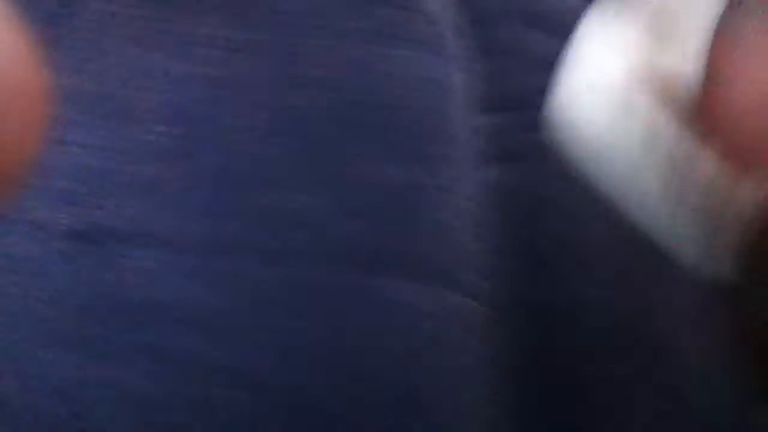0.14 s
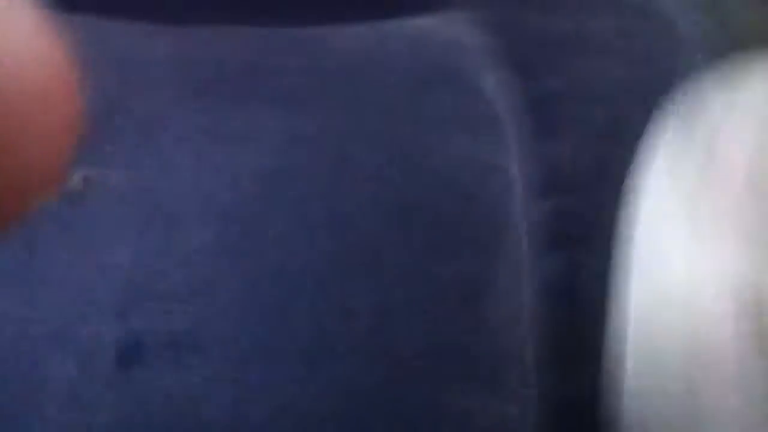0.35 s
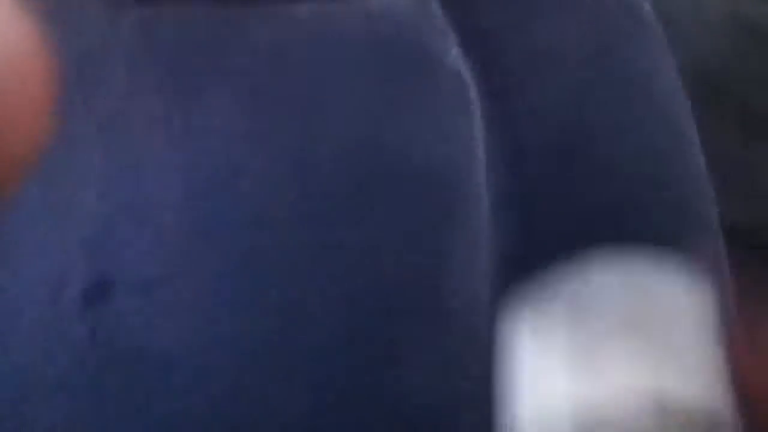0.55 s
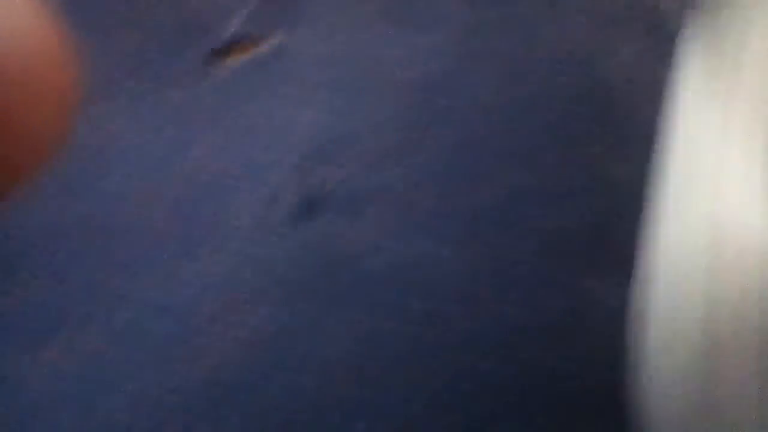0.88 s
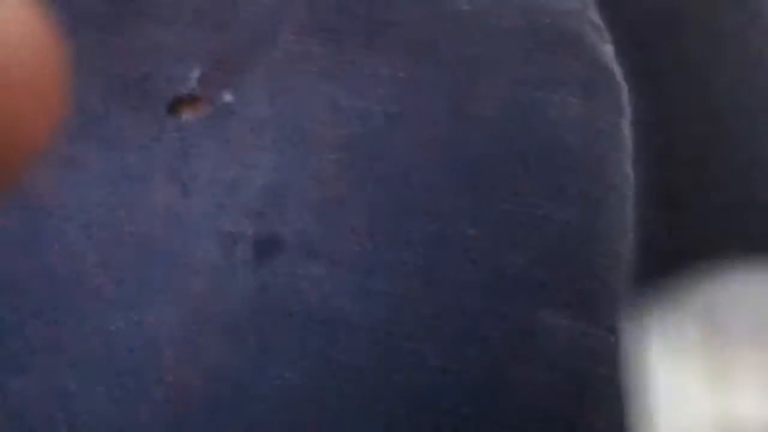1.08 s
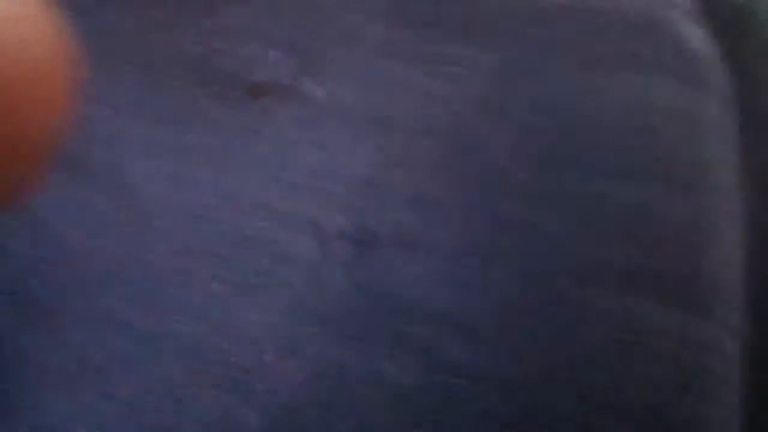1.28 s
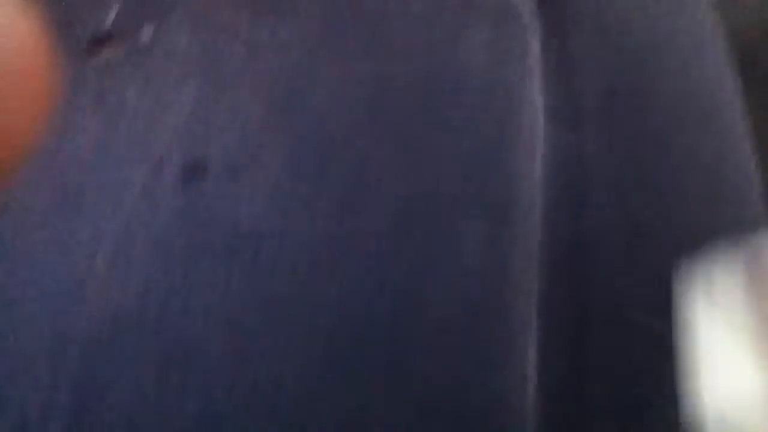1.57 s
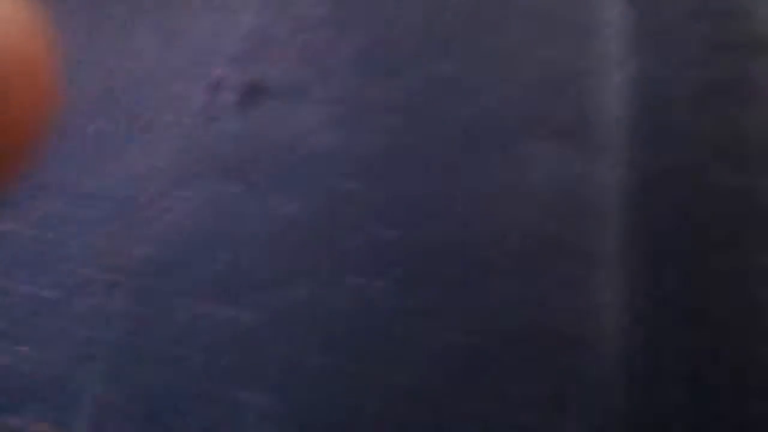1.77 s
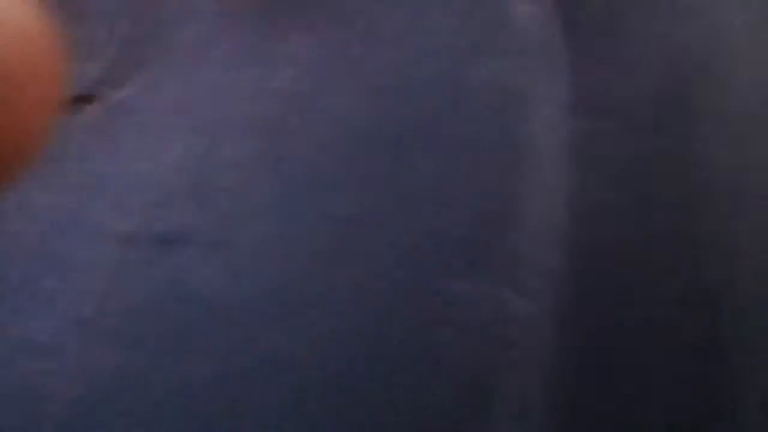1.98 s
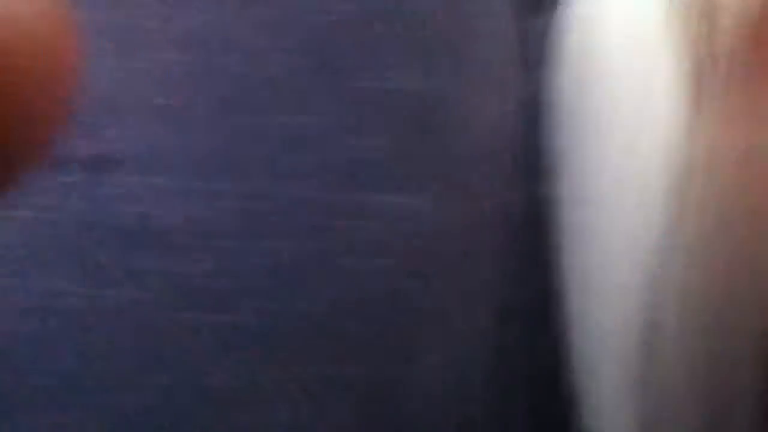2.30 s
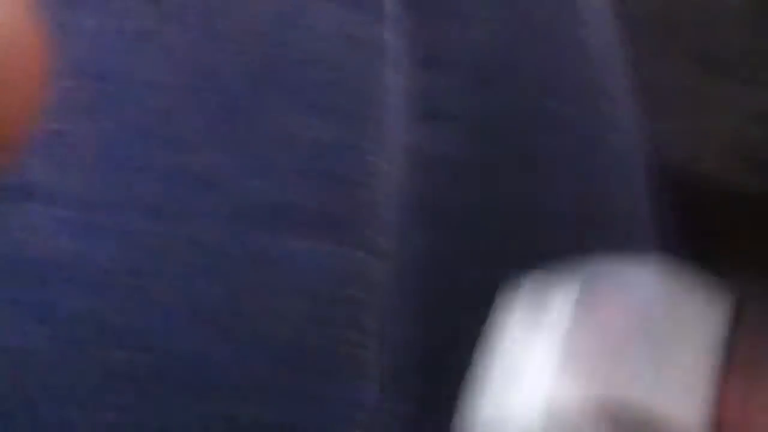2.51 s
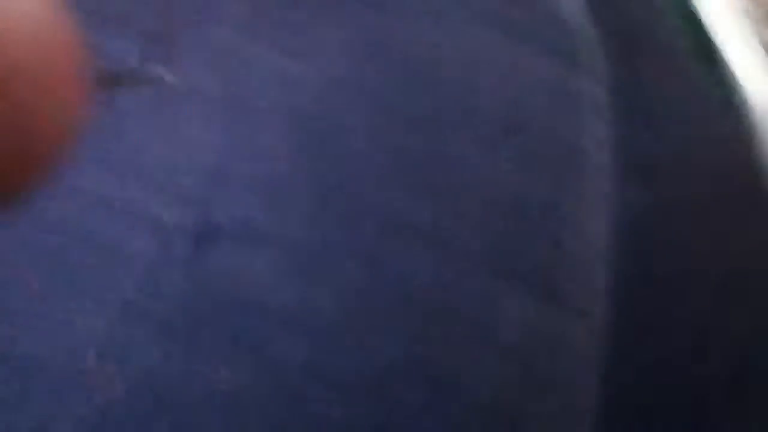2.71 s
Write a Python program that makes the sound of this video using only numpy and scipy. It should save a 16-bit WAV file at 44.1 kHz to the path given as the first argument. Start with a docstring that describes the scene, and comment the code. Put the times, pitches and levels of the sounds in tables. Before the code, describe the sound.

A hand scrubber rubs rapidly back and forth on cloth upholstery, with two sharp clicks

```python
"""A close, dry rub comes first: a hand scrubber goes back and forth on a cloth seat, about four strokes a second.
Catching fibres ring through its body, the cushion rumbles, the nap hisses, and the ribs of the weave sing
a rough note that follows the hand's speed. Random grains make the textures; fuzzy sine lines make the note.
Two sharp clicks, each a filtered impulse, chatter and thud, cut in over snags, bumps, squeaks and rustle."""
import sys
import numpy as np
from scipy import signal
from scipy.fft import rfft, irfft, next_fast_len
from scipy.io import wavfile
from scipy.ndimage import uniform_filter1d, map_coordinates

SR = 44100
rng = np.random.default_rng(int(sys.argv[2]) if len(sys.argv) > 2 else 0)


def to_wav(s):
    """Save 16-bit WAV."""
    ch = np.atleast_2d(s).T  # columns
    pcm = np.round(np.clip(ch, -1, 1) * 32767)  # PCM
    wavfile.write(sys.argv[1], SR, pcm.astype(np.int16))


N = 125685

# Strokes of the hand; levels are before speed, grip and pressure shape them:
# (start [s], end [s], rub level [dB], bright edge level [dB], hiss level [dB], cushion level [dB],
#  rib rate at top speed [Hz], weave level [dB], pressure growth over the stroke [dB])
STROKES = [(-.2, 0.062, -40, -34.5, -49, -41, 1700, -48, -13.5),
           (0.06, 0.347, -36.5, -36, -50.5, -45.5, 2128, -45, -4),
           (0.337, 0.6, -40.5, -40.5, -56, -47.5, 1727, -42, 9.5),
           (0.608, 0.877, -37.5, -36, -50, -46.5, 2046, -39.5, -4),
           (0.881, 1.142, -39.5, -38, -54, -44.5, 2099, -43.5, 7),
           (1.14, 1.37, -36, -36.5, -50.5, -45, 2076, -41, 1.5),
           (1.39, 1.623, -52, -47, -65, -60, 1660, -57, 13.5),
           (1.623, 1.871, -44, -42.5, -57.5, -51, 2100, -50.5, 7),
           (1.872, 2.113, -48, -46.5, -64, -57, 1907, -47.5, 4),
           (2.105, 2.339, -42.5, -44, -56, -55, 2015, -47, 3.5),
           (2.355, 2.559, -41.5, -40, -55, -53, 2246, -45.5, 4),
           (2.558, 2.809, -40.5, -40, -53.5, -51, 2234, -43, 2.5),
           (2.811, 3.052, -38, -46, -56, -45, 1895, -44, -1.5)]
# Colours, relative within each table: (frequency [Hz], level [dB])
RUB_COLOUR = [(150, -37.5), (300, -7.5), (540, -8.5), (720, 0.5), (860, 2.5), (1060, 1), (1200, -6.5),
              (1420, -0.5), (1800, -7), (2200, -6), (2870, -19.5), (4200, -29.5), (5200, -27),
              (8000, -62.5)]  # fibres ringing through the scrubber's body
RASP_COLOUR = [(1700, -34.5), (2700, -1), (3500, -1.5), (6500, -26.5)]  # stiff fibres scratching
HISS_COLOUR = [(1880, -38), (3400, -3), (4560, -14.5), (5350, -11), (6160, -15), (7830, -10.5), (9400, -3),
               (11200, -6), (14700, -7.5)]  # nap of the cloth
CUSHION_COLOUR = [(40, -22), (140, -7.5), (185, 2.5), (212, -7.5), (245, 2.5), (295, -11), (360, -7),
                  (480, -16), (1000, -54.5)]  # rumble of the padding
RUSTLE_COLOUR = [(40, 6), (260, 0), (450, -2), (1300, -8), (3000, -21.5), (6500, -31.5), (10000, -25),
                 (15800, -34.5)]  # restless cloth
DULL_CLICK_COLOUR = [(50, -37), (130, -3.5), (546, -6), (1130, 4), (1560, -10.5), (1950, -3.5), (2390, -11),
                     (3100, -7.5), (3870, -14), (4460, -26), (5300, -16), (7400, -17.5), (9430, -31),
                     (11700, -29), (15000, -45)]  # first click
BRIGHT_CLICK_COLOUR = [(50, -21), (130, -1), (869, 4), (1500, -10), (2300, 6), (3650, -1), (4650, -10),
                       (5500, -8.5), (6700, -32.5), (8000, -17.5), (11100, -20), (15000, -41)]  # second click
THUD_COLOUR = [(110, -14.5), (300, 14.5), (850, 10.5), (2200, -24), (7000, -80)]  # the scrubber's shell settling after each click
# Gain of the scrubber's body on the weave note: (frequency [Hz], gain [dB])
WEAVE_BODY = [(400, -4.5), (1030, -0.5), (1220, -2), (1450, 0.5), (2000, -1), (2700, -3)]
# Fuzzy lines of the weave note: (multiple of the rib rate, level [dB], line width [Hz])
WEAVE_LINES = [(.5, -1, 45), (1, 2.5, 58)]
# The two clicks: (time [s], snap peak [dB], thud peak [dB], thud delay [s])
CLICKS = [(1.4291, -1.5, -25, 0.00608), (1.934, -2, -34, 0.00476)]
# Fibres snag and let go; starting level before the low-pass: (time [s], level [dB])
SNAGS = [(0.365, -45), (.912, -37.5), (1.177, -33.5), (1.531, -37), (2.4, -36.5)]
# The scrubber bumps over the padding: (time [s], level [dB])
BUMPS = [(0.199, -43), (.763, -46), (1.016, -39), (1.061, -41), (1.28, -38), (1.74, -42.5), (2.675, -45)]
# Thin, hissy squeaks as the pad turns, level at the top of the swell: (time [s], level [dB])
SQUEAKS = [(2.12, -71.5), (2.55, -71)]
# Level curve of the rustling cloth: (time [s], level [dB])
RUSTLE_LEVEL = [(0, -54.5), (.35, -51.5), (0.601, -53.5), (.88, -53), (1.14, -52), (1.381, -53),
                (1.62, -55.5), (1.869, -59), (2.101, -57.5), (2.34, -59), (2.549, -50), (2.799, -57.5)]

GRIP_SPEED = 0.33  # share of top speed around which the fibres take hold
CUSHION_GROWS = 0.36  # cushion loudness as a power of speed; the other layers are proportional to it
EDGE_HZ = 1360  # above this lies the bright edge of the rub
CATCHES_PER_S, CATCH_SPREAD_DB = 5000, 2
RASP_DB = -23  # against the bright edge
WEAVE_FADE_DB = 6.5  # fall of the note over a stroke, before pressure
WEAVE_LAG_S = 0.00585  # the pad trails the hand
WEAVE_BREAK_DB = 4  # depth of the skips as the pad crosses the ribs
WANDER, WANDER_PER_S = 0.046, 28  # uneven sliding: share of speed, random knots a second
SPREAD_HZ = 2204  # the shell delays what lies below this
CRACK_DB, CRACK_T60_S = -26, .009  # contact chatter, against the click's peak
SNAG_T60_S, SNAG_TOP_HZ = 0.059, 2000
BUMP_HZ, BUMP_WIDTH_S = 227, 0.01
SQUEAK_HZ, SQUEAK_WIDTH_HZ, SQUEAK_WIDTH_S = 10490, 500, 0.092
LOW_CUT_HZ, TOP_HZ = 170, 15800


def amp(db):
    """Decibels to gain."""
    return 10 ** (np.asarray(db) / 20)


def unit(x):
    """Scale to rms 1."""
    return x / np.sqrt(np.mean(x ** 2) + 1e-20)


def along(points, hz):
    """Read (Hz, value) points on a log axis."""
    f, v = np.transpose(points)
    return np.interp(np.log(hz + 1), np.log(f + 1), v)


def wobble(rate):
    """A smooth random curve, rate knots a second."""
    knots = rng.standard_normal(4096)
    return map_coordinates(knots, [np.arange(N) * rate / SR], mode="wrap")


def filtered(x, response):
    """Shape x by a response of frequency."""
    size = next_fast_len(N + SR // 2)
    spectrum = rfft(x, size) * response(np.fft.rfftfreq(size, 1 / SR))
    return irfft(spectrum, size)[:N]


def impulse(colour, size=4096):
    """The causal, minimum-phase ring of a colour."""
    gain = amp(along(colour, np.fft.rfftfreq(size, 1 / SR)))
    cepstrum = irfft(np.log(gain + 1e-6))
    # Folding the cepstrum forward puts the energy as early as possible
    cepstrum[1:size // 2] *= 2
    cepstrum[size // 2 + 1:] = 0
    return irfft(np.exp(rfft(cepstrum)))


def add(out, s, sound):
    """Mix a sound in at a time in seconds."""
    i = round(s * SR)
    out[i:i + len(sound)] += sound[:N - i]


def grains(colour, per_s, spread_db):
    """Fibres that catch at random moments and ring with one colour, rms 1."""
    hits = rng.random(N) < per_s / SR
    signs = rng.choice([-1, 1], N)
    strengths = amp(spread_db * rng.standard_normal(N))
    return unit(signal.fftconvolve(hits * signs * strengths, impulse(colour))[:N])


def uneven(x, depth_db, size=512):
    """Random gain, smoothed over time and frequency, makes the texture uneven; rms 1."""
    z = signal.stft(x, nperseg=size)[2]
    field = uniform_filter1d(rng.standard_normal(z.shape), size=2, axis=0)  # across frequency
    field = uniform_filter1d(field, size=7, axis=1)  # across time
    return unit(signal.istft(z * amp(depth_db * unit(field)), nperseg=size)[1][:N])


def scrubbing(judder_db, hiss_judder_db, lumps_db, uneven_db, hiss_uneven_db):
    """Speed and grip drive the rub, its bright edge, the hiss, the cushion and the weave note."""
    rub, edge, hiss, cushion, note, rib_hz = np.zeros((6, N))
    for start, end, rub_db, edge_db, hiss_db, cushion_db, top_hz, weave_db, lean_db in STROKES:
        position, speed, grip = stroke(start, end, lean_db)
        rub += amp(rub_db) * grip * speed
        edge += amp(edge_db) * grip * speed
        hiss += amp(hiss_db) * grip * speed
        cushion += amp(cushion_db) * grip * speed ** CUSHION_GROWS
        note += amp(weave_db - WEAVE_FADE_DB * position) * grip * speed
        _, pad_speed, _ = stroke(start + WEAVE_LAG_S, end + WEAVE_LAG_S, lean_db)
        rib_hz += top_hz * pad_speed

    catches = uneven(grains(RUB_COLOUR, CATCHES_PER_S, CATCH_SPREAD_DB), uneven_db)
    low = filtered(catches, lambda hz: 1 / (1 + (hz / EDGE_HZ) ** 4))
    rasp = amp(RASP_DB) * grains(RASP_COLOUR, per_s=900, spread_db=6.5)
    bright = catches - low + rasp
    wandering_rib_hz = rib_hz * (1 + WANDER * wobble(WANDER_PER_S))
    body = rub * low + edge * bright + note * weave(wandering_rib_hz)

    nap = hiss * uneven(grains(HISS_COLOUR, per_s=24000, spread_db=5.0), hiss_uneven_db)
    lumps = amp(lumps_db * wobble(55))
    rumble = cushion * lumps * grains(CUSHION_COLOUR, per_s=2700, spread_db=1.5)
    judder = wobble(70)  # body and nap flutter together
    return amp(judder_db * judder) * body + amp(hiss_judder_db * judder) * nap + rumble


def stroke(start, end, lean_db):
    """Position (-.5 to .5), speed (0-1) and grip with pressure: the hand swings like a pendulum."""
    position = np.clip((np.arange(N) / SR - start) / (end - start), 0, 1) - .5
    speed = np.abs(np.cos(np.pi * position))
    hold = 1 - np.exp(-(speed / GRIP_SPEED) ** 3)
    return position, speed, hold * amp(lean_db * position)


def weave(rib_hz):
    """Ribs of the cloth pass under the scrubber: fuzzy lines glide together through its resonances."""
    phase = 2 * np.pi * np.cumsum(rib_hz) / SR
    lines = np.zeros(N)
    for multiple, db, width in WEAVE_LINES:
        # Random sine and cosine weights blur each line
        sine = wobble(2 * width) * np.sin(multiple * phase)
        cosine = wobble(2 * width) * np.cos(multiple * phase)
        lines += amp(db) * (sine + cosine)
    skips = amp(WEAVE_BREAK_DB * wobble(WANDER_PER_S))
    return filtered(unit(lines * skips), lambda hz: amp(along(WEAVE_BODY, hz)))


def clicks():
    """Two hard plastic clicks: a snap whose lows lag its highs, brief chatter and a dead thud of the shell."""
    out, t = np.zeros(N), np.arange(SR // 10) / SR
    thud = impulse(THUD_COLOUR)
    pole = np.exp(-2 * np.pi * SPREAD_HZ / SR)
    for (s, peak_db, thud_db, delay), colour in zip(CLICKS, (DULL_CLICK_COLOUR, BRIGHT_CLICK_COLOUR)):
        snap = signal.lfilter([-pole, 1], [1, -pole], impulse(colour))  # all-pass: delays the lows
        chatter = unit(signal.fftconvolve(rng.standard_normal(len(t)), snap)[:len(t)])
        add(out, s, amp(peak_db) * snap / np.abs(snap).max())
        add(out, s, amp(peak_db + CRACK_DB - 60 * t / CRACK_T60_S) * chatter)
        add(out, s + delay, amp(thud_db) * thud / np.abs(thud).max())
    return out


def snags():
    """Cloth holds on and lets go: short, soft bursts of decaying noise in the rub's colour."""
    out, t = np.zeros(N), np.arange(SR // 10) / SR
    for s, db in SNAGS:
        noise = rng.standard_normal(len(t))
        burst = unit(signal.fftconvolve(noise, impulse(RUB_COLOUR))[:len(t)])
        add(out, s, amp(db - 60 * t / SNAG_T60_S) * burst)
    return signal.sosfilt(signal.butter(2, SNAG_TOP_HZ, fs=SR, output="sos"), out)


def bumps():
    """The padding gives soft, low thumps: short swells of a sine, each slightly detuned."""
    out, t = np.zeros(N), np.arange(N) / SR
    for s, db in BUMPS:
        detune, turn = rng.standard_normal(2)
        swell = np.exp(-((t - s) / BUMP_WIDTH_S) ** 2)
        hz = BUMP_HZ * (1 + 0.072 * detune)
        out += amp(db) * np.sqrt(2) * swell * np.sin(2 * np.pi * hz * (t - s) + np.pi * turn)
    return out


def squeaks():
    """A narrow band of treble noise swells and fades across two of the turns."""
    t = np.arange(N) / SR
    swell = sum(amp(db) * np.exp(-((t - s) / SQUEAK_WIDTH_S) ** 2) for s, db in SQUEAKS)
    noise = rng.standard_normal(N)
    band = filtered(noise, lambda hz: np.exp(-((hz - SQUEAK_HZ) / SQUEAK_WIDTH_HZ) ** 2))
    return swell * unit(band)


def rustle():
    """The cloth never quite rests: a bed of small fibre catches under everything."""
    s, db = np.transpose(RUSTLE_LEVEL)
    level = amp(np.interp(np.arange(N) / SR, s, db))
    return level * grains(RUSTLE_COLOUR, per_s=8200, spread_db=2.0)


def scene():
    """Everything is close and dry: the upholstery swallows any echo."""
    scrub = scrubbing(judder_db=0.8, hiss_judder_db=0.53, lumps_db=3.0, uneven_db=2.5, hiss_uneven_db=3.0)
    return (scrub + clicks() + snags() + bumps() + squeaks() + rustle())[None]


def record(dry):
    """The microphone sheds the deep bass; a steep low-pass sets the band limit."""
    x = signal.sosfilt(signal.butter(2, LOW_CUT_HZ, "high", fs=SR, output="sos"), dry[0])
    return signal.sosfilt(signal.cheby1(14, .2, TOP_HZ, fs=SR, output="sos"), x)[None]


dry = scene()
out = record(dry)
to_wav(out)
```